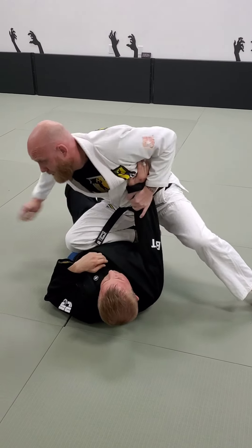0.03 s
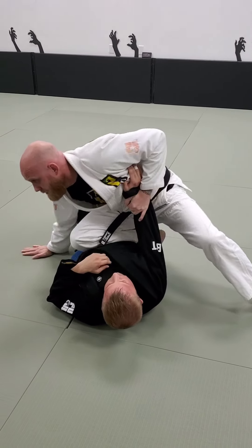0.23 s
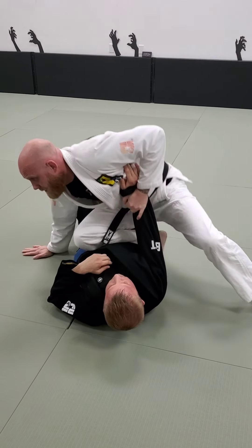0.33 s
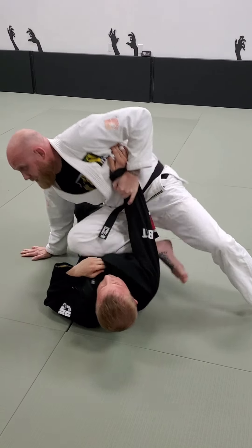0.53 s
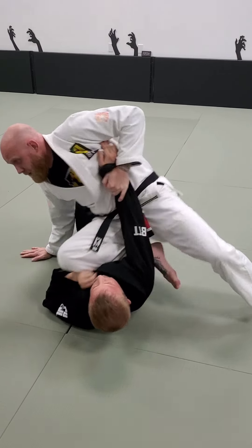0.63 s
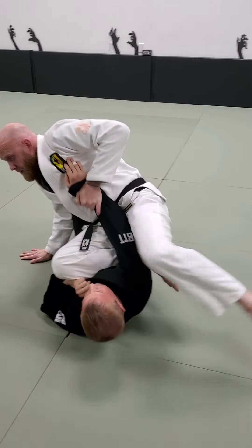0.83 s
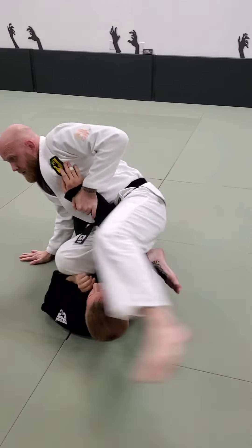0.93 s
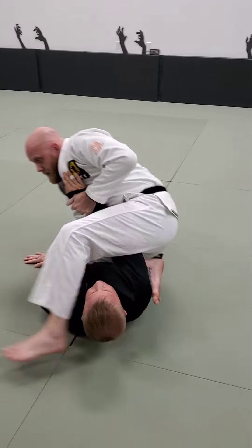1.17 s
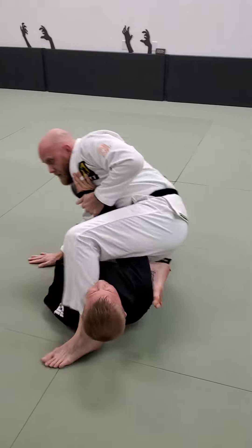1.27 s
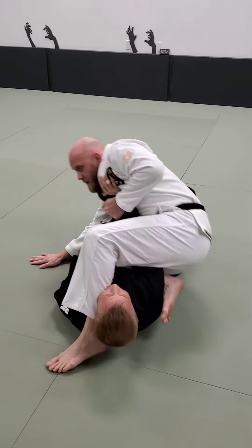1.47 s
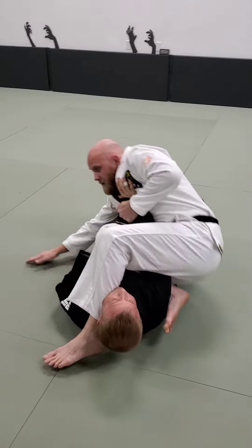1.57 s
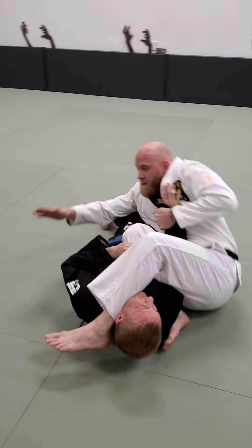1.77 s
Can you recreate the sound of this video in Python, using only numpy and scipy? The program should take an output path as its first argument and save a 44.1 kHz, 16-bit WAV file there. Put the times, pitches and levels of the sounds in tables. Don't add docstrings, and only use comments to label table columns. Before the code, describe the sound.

A hand slaps a padded mat hard almost at once, with a deep foam thump and short hard-walled echo; then heavy cotton rustles, a tick, and faint foot and knee knocks over ventilation, picked up by a phone.

```python
import sys
import numpy as np
from scipy import signal
from scipy.fft import rfft, irfft, next_fast_len
from scipy.io import wavfile
from scipy.ndimage import uniform_filter1d, map_coordinates

SR = 44100
rng = np.random.default_rng(int(sys.argv[2]) if len(sys.argv) > 2 else 0)


def digitize_waveform(pressure):
    field = np.atleast_2d(pressure).T
    bounded = np.clip(field, -1, 1)
    quanta = np.round(bounded * 32767).astype(np.int16)
    wavfile.write(sys.argv[1], SR, quanta)


def nominal_scale(level):
    x = np.asarray(level, float) / 20
    return 10 ** x


N = 79380

# f/Hz, level per Hz/dB
RUMBLE_COLOUR = [(12, -12), (20, -9.5), (75, -1.5), (98, -12.5), (146, -20.5), (167, -42), (250, -56),
                 (320, -31), (550, -120)]
# f/Hz, level per Hz/dB
AIR_COLOUR = [(120, -51), (200, -9.5), (320, -2), (480, -21.5), (700, -15.5), (1100, -12), (7500, -19.5),
              (16000, -18)]
# t/s, level/dB
HISS_LEVEL = [(0.0, -75), (0.274, -62.5), (0.39, -67), (0.68, -65.5), (1.178, -67.5), (1.388, -73.5),
              (1.598, -67), (1.8, -67)]
# t/s, level/dB
RUSTLE_LEVEL = [(0.0, -56), (0.23, -57), (0.38, -47), (0.456, -51), (0.626, -53.5), (0.756, -60),
                (1.534, -58.5), (1.8, -51.5)]
# f/Hz, level per Hz/dB
CLOTH_COLOUR = [(88, -33), (150, -27), (303, -2), (347, -6.5), (876, -6.5), (954, -15), (3170, -22),
                (9000, -33.5), (11700, -69), (19800, -120)]
# t/s, length/s, level/dB
SCUFFS = [
    (1.2845, 0.016, -33.5),
    (1.1, 0.028, -58.5),
    (0, 0.017, -63),
]
# f/Hz, level per Hz/dB
SOLE_COLOUR = [(500, -1), (1500, -11.5), (2800, 0.5), (4000, -5.5), (7500, -2), (16000, 3.5)]
# t/s, thump level/dB, smack level/dB, thump f/Hz, smack length/s
LANDINGS = [(.001, -47.5, -56, 250, 0.019), (0.1633, -41, -58.5, 71, 0.0089),
            (.2293, -3.5, -13.5, 109.9, 0.004), (0.695, -39.5, -84, 64, 0.012),
            (0.8286, -45.5, -56, 299, 0.0034), (1.2812, -41, -67, 324.1, 0.0045),
            (1.2866, -29, -70, 291, 0.0046), (1.2871, -33.5, -70, 94.3, .004),
            (1.572, -46, -61, 229, 0.0092), (1.715, -42, -81, 70.3, .01), (1.7911, -25.5, -70, 195, .006), ]
# pitch ratio, level/dB, time to fall 60 dB after the hold/s
FOAM_MODES = [
    (1, -1, 0.057),
    (2.3, -14, 0.098),
    (6.6, -22.5, 0.021),
]
# f/Hz, level per Hz/dB
SKIN_COLOUR = [(300, 5.5), (700, 2), (1300, -0.5), (2200, -4), (3400, -6), (5000, -9), (8000, -8),
               (16000, -10)]
# f/Hz, width/Hz, level/dB
COVER_RINGS = [(800, 250, 3), (1330, 250, 3), (2160, 350, 5), (3300, 500, 5)]
# t/s, length/s, start f/Hz, end f/Hz, level/dB
SQUEAKS = [
    (.008, .018, 3300, 3700, -53),
    (.162, .009, 2150, 2150, -51),
    (.478, .054, 1100, 2150, -46),
    (.585, .03, 750, 620, -51),
    (1.277, .007, 1500, 1200, -45),
    (1.285, .032, 2600, 2950, -46),
]
# t/s, level/dB, f/Hz
TICKS = [
    (.808, -31, 11200),
    (0.8178, -41.5, 7000),
    (1.131, -46, 8820),
]
# f/Hz, likeness
LIKENESS = [(60, 0.93), (180, 1), (550, -0.39), (1650, 0.24), (4970, -0.39), (15000, 0.44)]
# delay/s, level/dB
WALL_ECHOES = [(.0095, -2), (.012, -8.5), (.028, -2), (.031, -12), (0.048, -11), (.075, -34), (.088, -19)]
# f/Hz, level/dB
WALL_COLOUR = [(100, -18), (300, -6), (700, -9), (2000, -8), (3500, -1), (9000, -2)]
# f/Hz, time/s
GYM_DECAY = [(60, 0.61), (150, 0.45), (300, 0.44), (700, 0.32), (2000, 0.36), (6000, 0.48), (14000, 0.43)]
# f/Hz, level/dB
TAIL_COLOUR = [(60, -0.5), (125, -7.5), (230, 4.5), (600, -2.5), (2000, -4.5), (5000, 2), (15000, -1.5)]
# f/Hz, level/dB
MIC_COLOUR = [(7900, 1), (8900, -11), (11000, -9), (12500, -6.5), (15600, -10), (16100, -57)]

AIR_DB, RUMBLE_DB, CLOTH_DB = -55, -50, 2.5
HOLD_CYCLES, RISE_CYCLES = 1.55, .4
NEAR_SHORTER, FAR_SHORTER = 0.87, 0.36
SMACKS_PER_S, SCATTER_DB = 20000, 0.5
SQUEAK_ROUGH = .5
TAIL_ONSET_S, WALL_BLUR_S = .016, 0.0013
LAG_S, PAN_DB = .00003, -.4
SMALL_WET_DB, QUIET_DB = -6.5, -20
LOW_CUT_HZ = 42


def unit(x):
    return x / np.sqrt(np.mean(x ** 2) + 1e-20)


def along(points, hz):
    f, v = np.transpose(points)
    return np.interp(np.log(hz + 1), np.log(f + 1), v)


def curve(rows):
    s, db = np.transpose(rows)
    return np.interp(np.arange(N) / SR, s, db)


def wobble(rate):
    knots = rng.standard_normal(int(N * rate / SR) + 4)
    return map_coordinates(knots, [np.arange(N) * rate / SR])


def filtered(x, response):
    m = next_fast_len(x.shape[-1] + 8192)
    spectrum = rfft(x, m) * response(np.fft.rfftfreq(m, 1 / SR))
    return irfft(spectrum, m)[..., :x.shape[-1]]


def pair(x, db):
    def response(hz):
        turn = np.arccos(np.clip(along(LIKENESS, hz), -1, 1)) / 2
        return nominal_scale(db(hz)) * [np.cos(turn), np.sin(turn)]

    mid, side = filtered(x, response)
    return np.array([mid + side, mid - side])


def rush(spectrum, patchy_db, grains=1):
    z = signal.stft(rng.standard_normal((2, N)), nperseg=512)[2]
    field = uniform_filter1d(rng.standard_normal(z.shape[1:]), 6, 0)
    field = uniform_filter1d(field, 10, 1)
    x = signal.istft(z * nominal_scale(patchy_db * unit(field)), nperseg=512)[1][:, :N]
    return unit(pair(x * grains, lambda hz: along(spectrum, hz)))


def add(track, s, x):
    track[:, round(s * SR):][:, :x.shape[1]] += x


def gym(x, wet_db, spread=None):
    if spread is None:
        spread = x
    hz, t, z = signal.stft(rng.standard_normal((2, SR)), SR, nperseg=512)
    fade = nominal_scale(-60 * t / along(GYM_DECAY, hz)[:, None])
    tail = signal.istft(z * fade, SR, nperseg=512)[1][:, :SR]
    t = np.arange(SR) / SR
    tail = tail * (1 - np.exp(-t / TAIL_ONSET_S))
    tail = pair(tail / np.linalg.norm(tail[0]), lambda f: along(TAIL_COLOUR, f) + wet_db)

    echoes = sum(nominal_scale(db + wet_db) * np.exp(-((t - delay) / WALL_BLUR_S) ** 2)
                 for delay, db in WALL_ECHOES)
    rough = echoes * rng.standard_normal((2, SR)) / np.sqrt(WALL_BLUR_S * SR)
    early = pair(rough, lambda f: along(WALL_COLOUR, f))
    early[0, 0] += nominal_scale(PAN_DB)
    early[1, round(LAG_S * SR)] += nominal_scale(-PAN_DB)
    direct = signal.fftconvolve(x[None], early, axes=1)
    return direct + signal.fftconvolve(spread[None], tail, axes=1)


def room_tone():
    rumble = nominal_scale(RUMBLE_DB + 1.8 * wobble(9)) * rush(RUMBLE_COLOUR + [(400, -120)], patchy_db=1.5)
    gain_db = curve(HISS_LEVEL) - curve(HISS_LEVEL).mean()
    hiss_db = AIR_DB + 1.03 * gain_db + 0.92 * wobble(3.7)
    return rumble + nominal_scale(hiss_db) * rush(AIR_COLOUR, patchy_db=-0.9)


def cloth():
    uneven_db, grains = 1.5 * wobble(14), nominal_scale(2 * wobble(300))
    level = nominal_scale(curve(RUSTLE_LEVEL) + uneven_db + CLOTH_DB)
    return level * rush(CLOTH_COLOUR, patchy_db=1.73, grains=grains)


def smack(length_s, t, colour, cover):
    meets = rng.random(len(t)) < SMACKS_PER_S / SR
    strength = rng.normal(0, 1, len(t))
    grains = meets * strength * nominal_scale(SCATTER_DB * rng.normal(0, 1, len(t)))

    def ring(f):
        rings = sum(nominal_scale(db) * 1j * f * w / (c * c - f * f + 1j * f * w) for c, w, db in cover)
        return nominal_scale(along(colour, f)) * (1 + rings)

    fade = np.minimum(1, nominal_scale(-60 * (t - length_s) / (.012 + .3 * length_s)))
    crackle = filtered(grains, ring) * fade
    click = filtered(1. * (np.arange(len(t)) == 128), ring)
    return [v / np.linalg.norm(v) * np.sqrt(length_s * SR) for v in (crackle, click)]


def scuffs():
    out, t = np.zeros((2, N + 2 * SR)), np.arange(SR // 4) / SR
    for s, length_s, db in SCUFFS:
        crackle, _ = smack(length_s, t, SOLE_COLOUR, [])
        add(out, s, nominal_scale(db) * gym(crackle, SMALL_WET_DB))
    return out[:, :N]


def thump(hz, t, shorter):
    after = np.maximum(t - shorter * HOLD_CYCLES / hz, 0)
    foam = sum(nominal_scale(db - 60 * after / t60 / shorter) * np.sin(2 * np.pi * hz * k * t - np.pi / 2)
               for k, db, t60 in FOAM_MODES)
    rise = 1 - np.exp(-(t * hz / RISE_CYCLES / shorter) ** 2)
    return foam * rise / np.sqrt(shorter)


def landings():
    out, t = np.zeros((2, N + 2 * SR)), np.arange(SR // 4) / SR
    for s, thump_db, smack_db, hz, length_s in LANDINGS:
        crackle, click = nominal_scale(smack_db) * np.array(smack(length_s, t, SKIN_COLOUR, COVER_RINGS))
        near = nominal_scale(thump_db) * thump(hz, t, NEAR_SHORTER)
        far = nominal_scale(thump_db) * thump(hz, t, FAR_SHORTER)
        wet_db = SMALL_WET_DB * (thump_db < QUIET_DB)
        add(out, s, gym(near + crackle, wet_db, spread=far + click))
    return out[:, :N]


def squeaks():
    out = np.zeros((2, N + 2 * SR))
    for s, length_s, from_hz, to_hz, db in SQUEAKS:
        u = np.arange(round(length_s * SR)) / SR / length_s
        rough = SQUEAK_ROUGH * unit(uniform_filter1d(rng.standard_normal((2, len(u))), size=50))
        phase = 2 * np.pi * np.cumsum(from_hz + (to_hz - from_hz) * u) / SR
        tone = (1 + rough[0]) * np.sin(phase + rough[1])
        add(out, s, gym(nominal_scale(db) * np.sin(np.pi * u) * tone, SMALL_WET_DB))
    return out[:, :N]


def ticks():
    out, t = np.zeros((2, N + 2 * SR)), np.arange(SR // 100) / SR
    for s, db, hz in TICKS:
        burst = rng.standard_normal((2, len(t))) * np.exp(-((t - .004) / 0.0011) ** 2)
        tick = filtered(burst, lambda f: 1 / (1 + (np.log2((f + 1) / hz) / 0.43) ** 4))
        add(out, s - .004, nominal_scale(db) * tick)
    return out[:, :N]


def scene():
    on_the_mat = landings() + scuffs()
    small_sounds = ticks() + squeaks()
    return on_the_mat + small_sounds + cloth() + room_tone()


def band_limit(x):
    return signal.sosfilt(signal.butter(12, 16830, fs=SR, output="sos"), x)


def record(dry):
    def microphone(hz):
        low_cut = (1j * hz / (LOW_CUT_HZ + 1j * hz)) ** 2
        return nominal_scale(along(MIC_COLOUR, hz)) * low_cut

    x = filtered(dry, microphone)
    x = x / (1 + np.abs(x / .95) ** 6) ** (1 / 6)
    return band_limit(x)


dry = scene()
out = record(dry)
digitize_waveform(out)
```